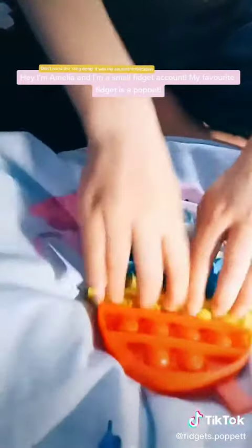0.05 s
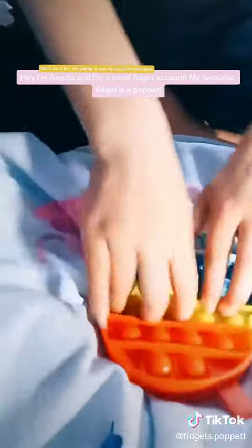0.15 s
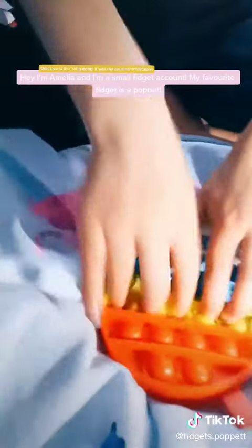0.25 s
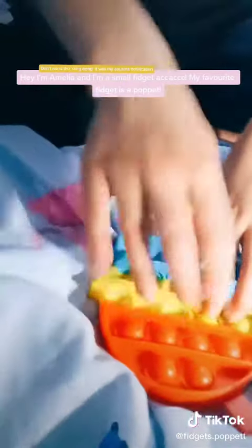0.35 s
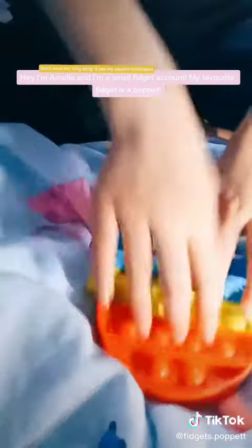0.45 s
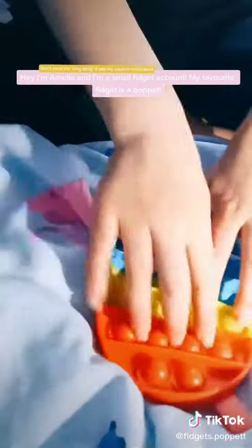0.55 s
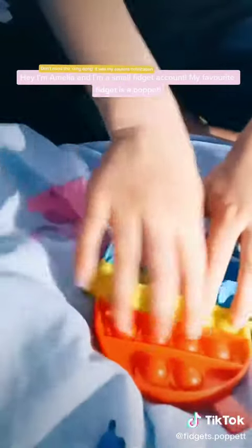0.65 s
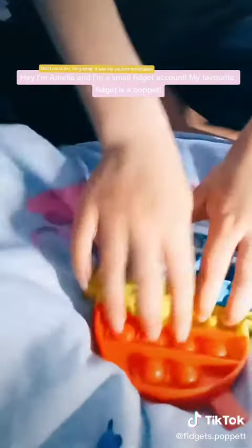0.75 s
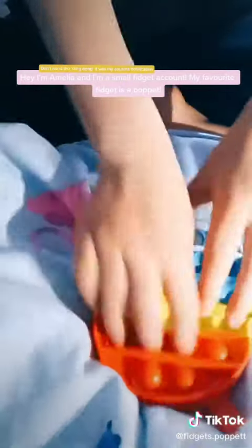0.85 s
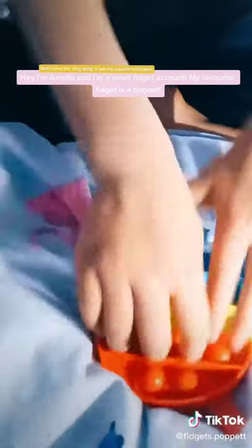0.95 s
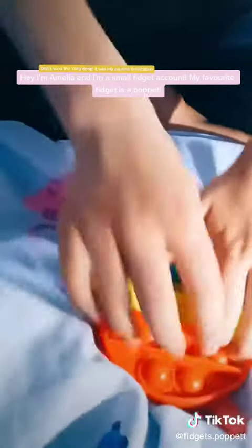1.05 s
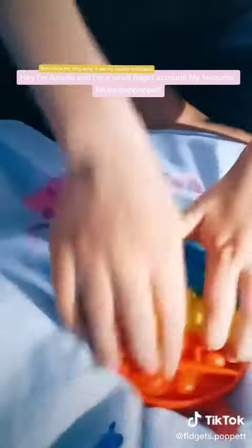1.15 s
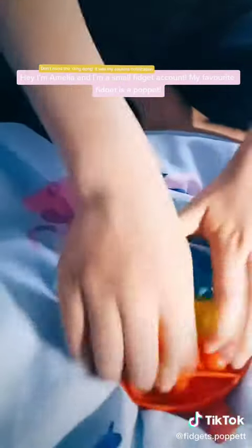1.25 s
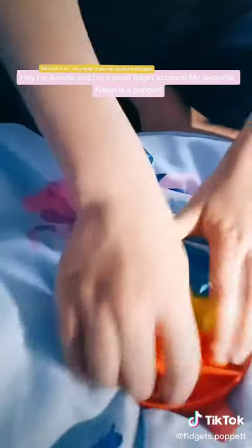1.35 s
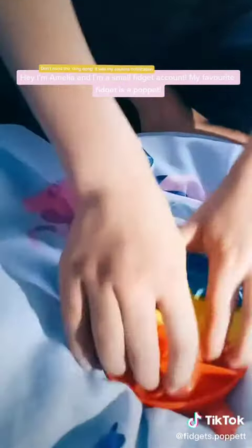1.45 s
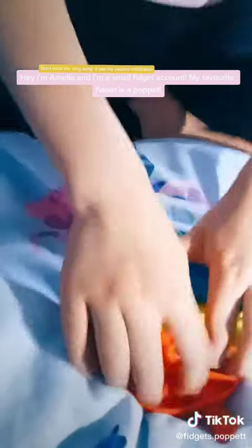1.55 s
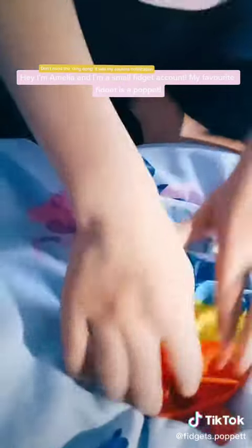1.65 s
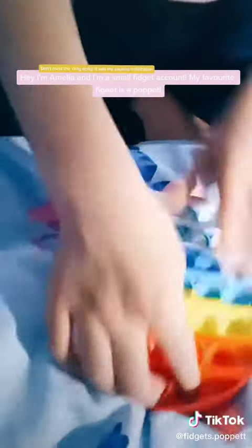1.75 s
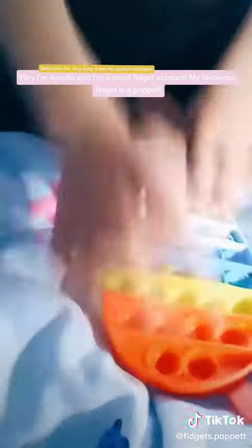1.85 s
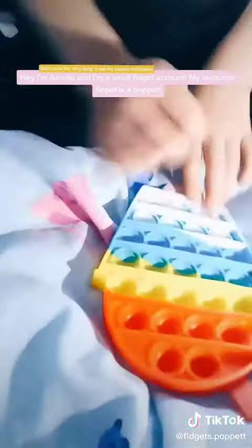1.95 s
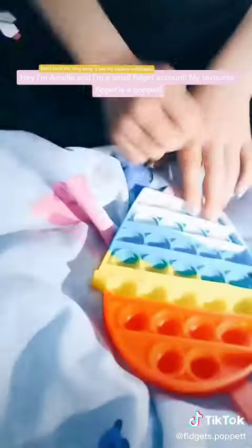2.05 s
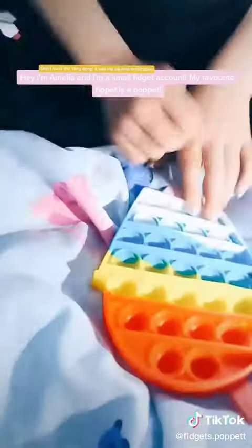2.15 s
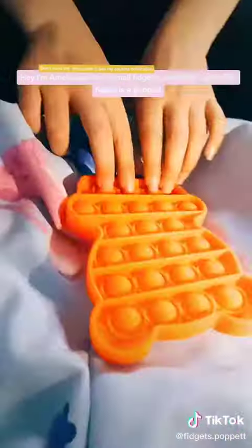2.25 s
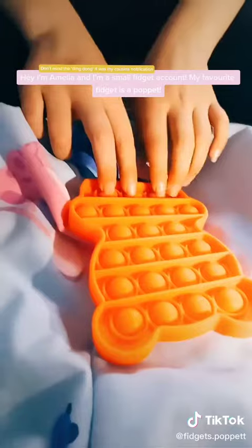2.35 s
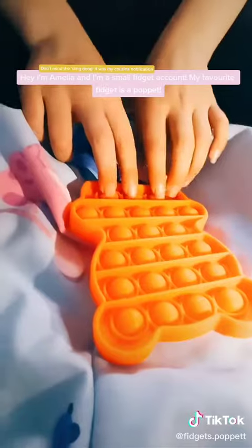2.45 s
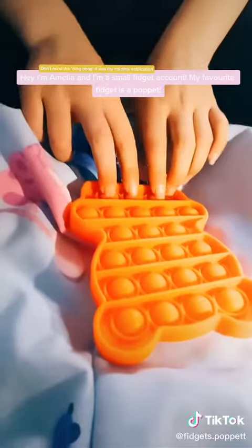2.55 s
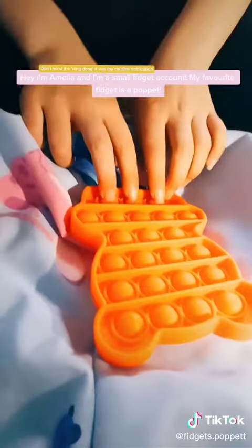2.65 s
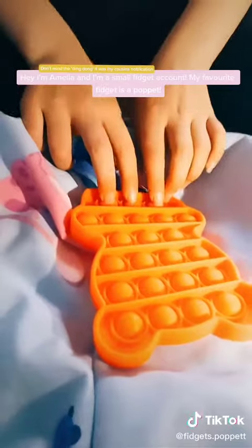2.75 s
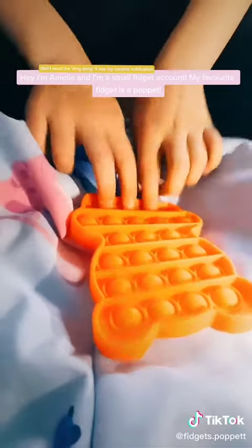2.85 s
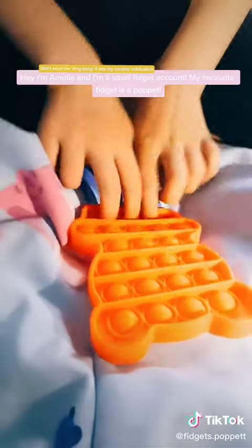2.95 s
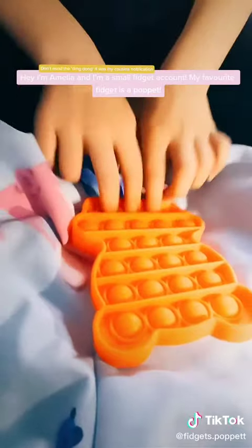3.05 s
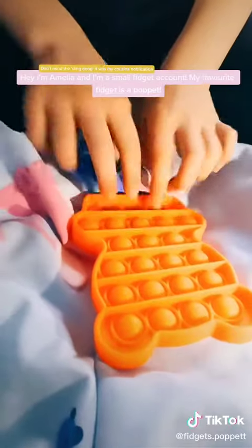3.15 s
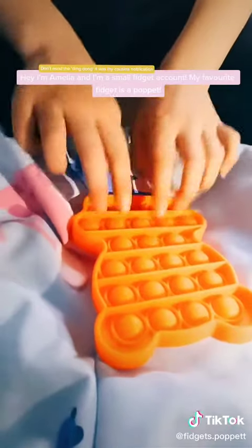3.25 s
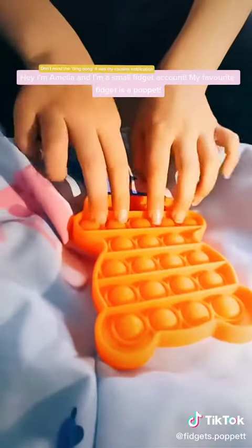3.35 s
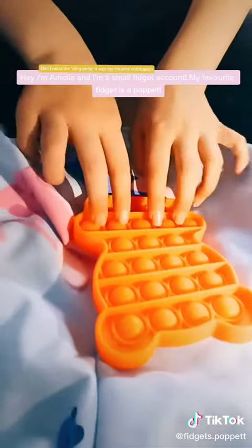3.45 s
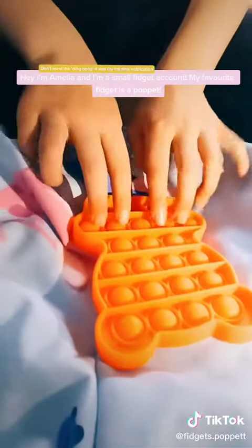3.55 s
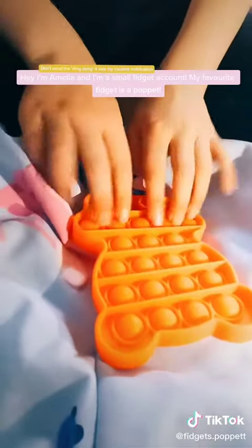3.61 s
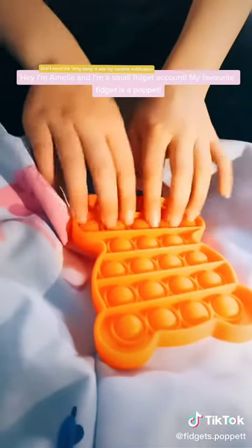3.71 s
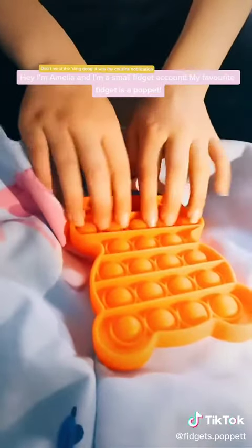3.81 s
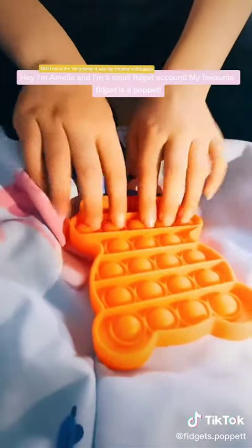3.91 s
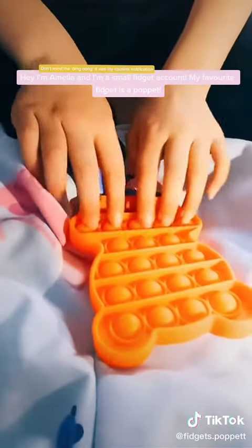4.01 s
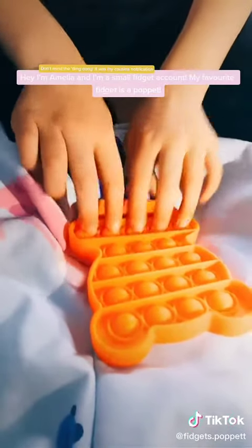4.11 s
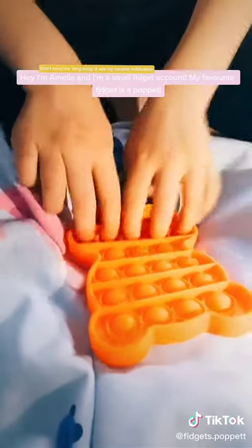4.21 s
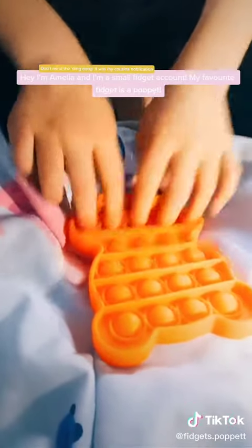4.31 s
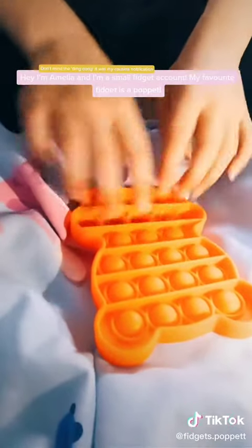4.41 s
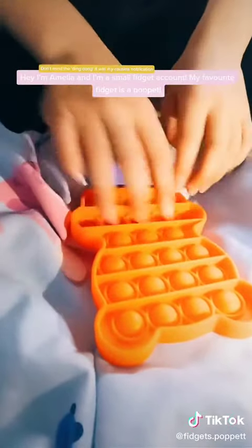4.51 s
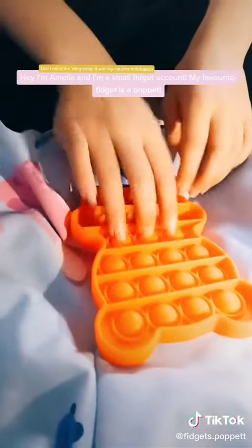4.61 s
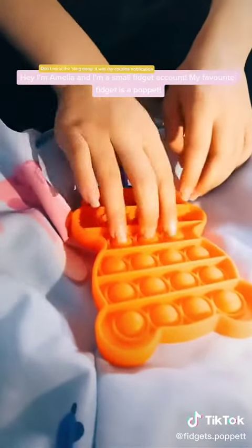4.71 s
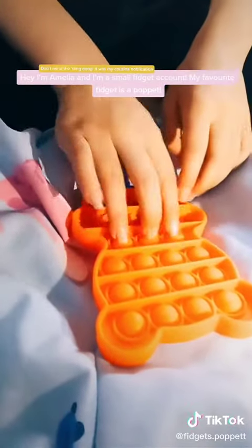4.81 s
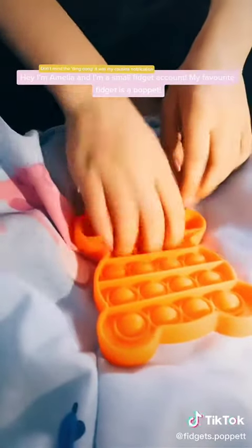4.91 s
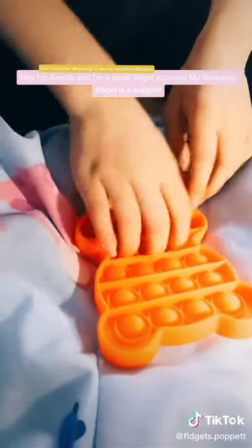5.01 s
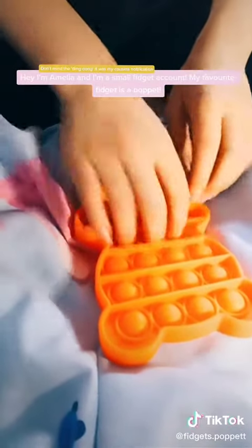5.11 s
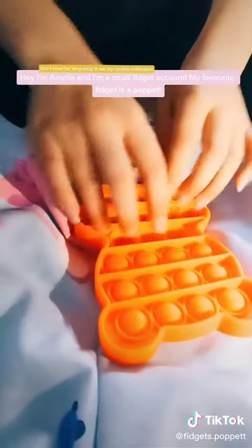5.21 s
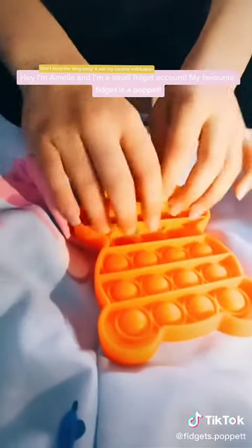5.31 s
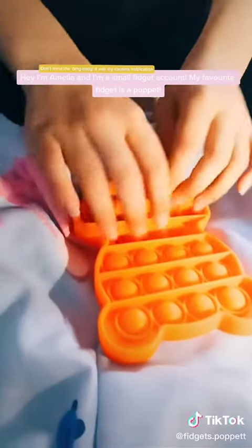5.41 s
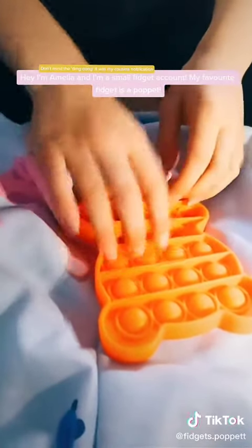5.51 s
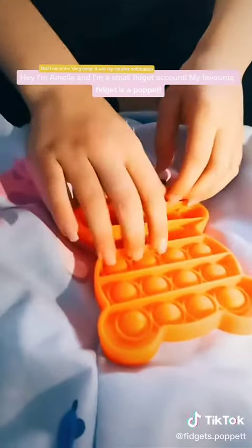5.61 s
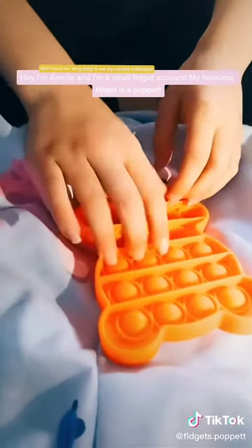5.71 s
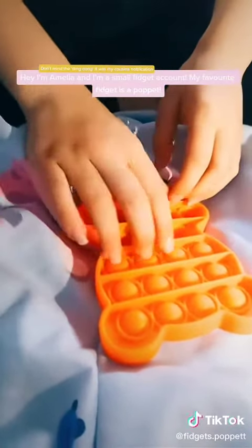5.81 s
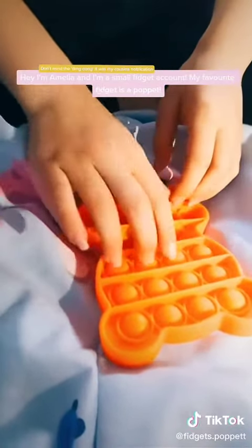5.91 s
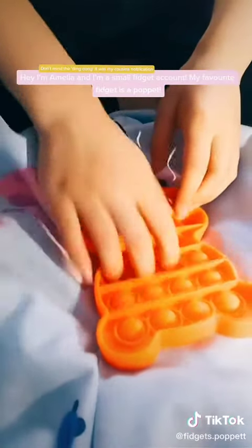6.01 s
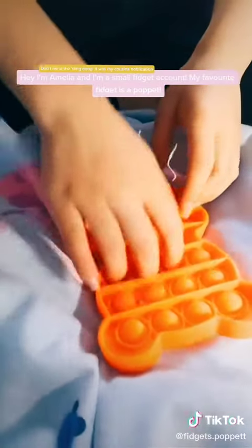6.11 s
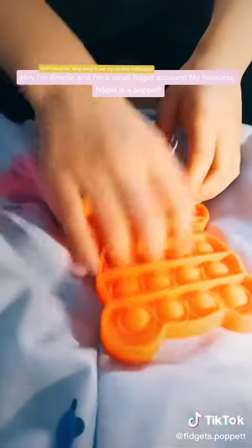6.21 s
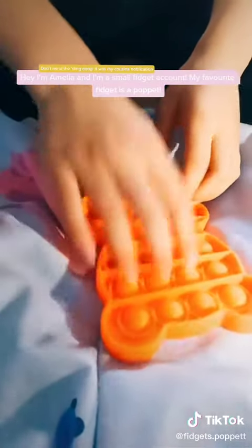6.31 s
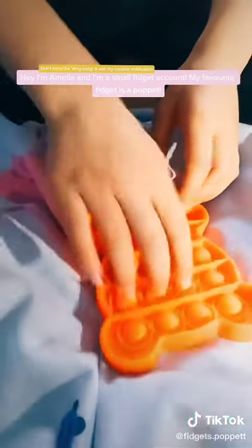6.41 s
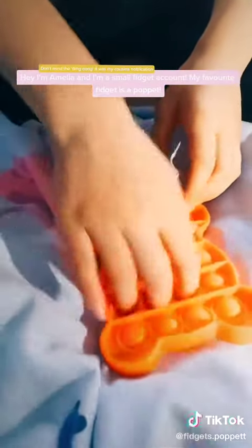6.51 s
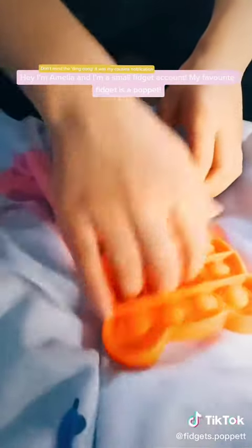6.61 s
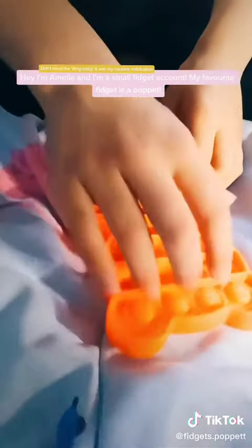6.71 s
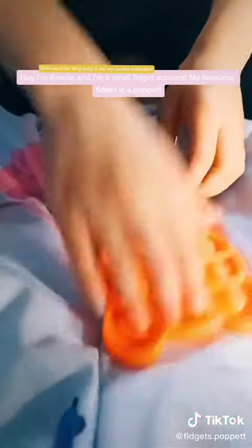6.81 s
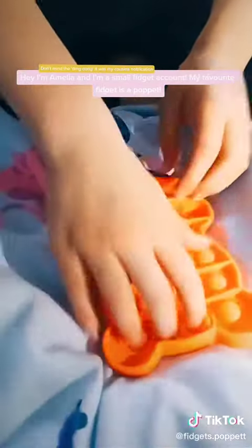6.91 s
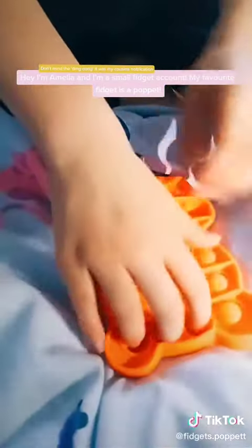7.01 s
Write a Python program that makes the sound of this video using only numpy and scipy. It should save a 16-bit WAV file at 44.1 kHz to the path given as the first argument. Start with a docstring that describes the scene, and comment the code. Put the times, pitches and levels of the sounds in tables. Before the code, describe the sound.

A close phone microphone picks up a silicone bubble toy on a duvet in a small bedroom, over faint, wide, low background noise. At 0.1 s three sharp hollow pops run together; soft taps and a thud follow near 0.5, then a tight cluster at 0.75-0.87. Single loud snaps come at 1.24, 1.49 and 1.63, with a firm knock into the bedding at 1.35. Skin and cloth rub at 1.9-2.15, then three dry bright ticks at 2.2 flick left and right as the background dips and gradually recovers. A quick group pops at 2.82-2.9. Faint rubs and hoarse squeaks lead to a dense crackling run at 4.13-4.19. More clusters follow at 4.92-4.96, 6.0, a softer one at 6.45, and a strong final trio at 6.9, with light taps, strokes and low thuds between. Each pop leaves a short boxy echo.

```python
"""Silicone bubbles snap on a pop-it toy that lies on a duvet, close to a phone in a small bedroom.
Each dome flips with a push and pull of air that rings its cup, plus filtered noise for crack and sheet.
Fingertips tap (ringing cups), rub (grainy noise), squeak (narrow noise) and thud the toy into the bedding
(fading sines); dry ticks sound left and right over a wide noise background that dips once.
The room answers with a short noise tail, and the phone's limiter holds down the loudest snaps."""
import sys
import numpy as np
from scipy import signal
from scipy.fft import rfft, irfft, next_fast_len
from scipy.io import wavfile
from scipy.ndimage import uniform_filter1d, minimum_filter1d

SR = 44100
rng = np.random.default_rng(int(sys.argv[2]) if len(sys.argv) > 2 else 0)


def wav_out(sig):
    """Save sig, one row per channel (or a flat mono array), as 16-bit PCM at SR to the path in sys.argv[1]."""
    wavfile.write(sys.argv[1], SR, np.round(np.clip(np.atleast_2d(sig).T, -1, 1) * 32767).astype(np.int16))


N = 311346
TIME = np.arange(N) / SR  # s
BLOW = np.arange(-256, 1024) / SR  # s, the time around one short contact


def undb(db):
    """Decibels to gain."""
    return 10 ** (np.asarray(db) / 20)


def unit(x):
    """Scale to rms 1."""
    return x / np.sqrt(np.mean(x ** 2))


def colour(x, points):
    """Minimum-phase filter drawn through (Hz, dB) points, so no sound leaks ahead of its cause."""
    size = next_fast_len(len(x) + 2048) * 2
    hz, db = np.transpose(points)
    bins = np.maximum(np.fft.rfftfreq(size, 1 / SR), 1)
    level_db = np.interp(np.log(bins), np.log(hz), db)
    # folding the cepstrum onto positive times makes the filter causal
    cepstrum = irfft(np.log(undb(level_db)))
    cepstrum[1:size // 2] *= 2
    cepstrum[size // 2 + 1:] = 0
    response = np.exp(rfft(cepstrum))
    return irfft(rfft(x, size) * response)[:len(x)]


def noise(points, count):
    """Coloured noise of rms 1."""
    return unit(colour(rng.standard_normal(count), points))


def resonate(x, hz, width_hz):
    """One resonance, gain 1 at its centre."""
    b, a = signal.iirpeak(hz, hz / width_hz, fs=SR)
    return signal.lfilter(b, a, x)


def swell(t, rise_s, fall_s):
    """Exponential rise up to t = 0, then exponential fall; both times are time constants."""
    return np.exp(-np.abs(t) / np.where(t < 0, rise_s, fall_s))


def add(track, s, sound):
    """Mix a sound into the track from time s."""
    start = int(round(s * SR))
    track[start:start + len(sound)] += sound[:N - start]


# Background spectrum: [f/Hz, relative level/dB per Hz]
AIR_COLOUR = [(15, -44.5), (25, -21), (47, -10), (87, -1.5), (212, -11.5), (330, -17.5), (440, -18.5),
              (510, -12.5), (620, -20.5), (775, -21.5), (1300, -23), (1480, -17.5), (1750, -24.5),
              (3000, -26.5), (3400, -26), (3820, -27), (5880, -28), (9070, -40.5), (12000, -42),
              (15000, -34)]
AIR_DB = -66.5
DIP_S, DIP_DB, DIP_FALL_S, DIP_RECOVER_S = 2.23, -17, 0.016, 0.31


def background(side_db):
    """Steady coloured noise, one layer in the middle and one at the sides, with one sudden dip and slow return."""
    level = undb(AIR_DB + DIP_DB * swell(TIME - DIP_S, DIP_FALL_S, DIP_RECOVER_S))
    mid = level * noise(AIR_COLOUR, N)
    side = undb(side_db) * level * noise(AIR_COLOUR, N)
    return mid, side


def snap(hz):
    """A dome darts through its flat state: one push of air and one pull, shorter when it is faster."""
    u = 2 * np.pi * hz * BLOW
    return -u / (1 + u ** 2) ** 2


# Spectrum of the noise that feeds each crack: [f/Hz, relative level/dB per Hz]
CRACK_COLOUR = [(600, -14), (2000, 1), (3500, -6), (5500, -7.5), (6600, -3), (7800, -19.5), (16000, -31.5)]


def crack(hz, rise_s, fall_s, width_hz=2300):
    """Tacky silicone tearing loose from the skin: a noise burst around one pitch."""
    tear = resonate(noise(CRACK_COLOUR, len(BLOW)), hz, width_hz)
    return unit(tear * swell(BLOW, rise_s, fall_s))


# Domes that flip: [t/s, level over 1 ms/dB, snap speed f/Hz, cup resonance f/Hz, crack centre f/Hz, crack level
# relative to the ringing body/dB, room send level relative to the near sound/dB]
POPS = [(0.09, -10, 750, 1220, 4200, -0.5, -16.5), (0.1003, -8.5, 510, 1340, 3650, -4, -4),
        (0.1103, -5, 1320, 1500, 3150, -2, -3), (0.749, -4.5, 992, 1180, 4120, -14, -12),
        (0.772, -9.5, 503, 1300, 5700, 2.5, -0.5), (0.8529, -7.5, 1220, 1424, 3880, 2, 0.5),
        (0.8572, -10, 1390, 1310, 3750, -15, -1.5), (0.871, -8.5, 1120, 1500, 4040, -8, -1),
        (1.241, -5, 990, 1218, 3900, -4.5, -4), (1.4894, -3.5, 1300, 1245, 3600, -4, -6),
        (1.6269, -5, 1000, 1020, 4270, -15, -10), (2.824, -21.5, 590, 880, 3236, -6, -2.5),
        (2.8654, -11, 1830, 980, 4550, -21, -4), (2.8856, -8, 1640, 980, 3470, -22, -4.5),
        (2.9017, -10.1, 1060, 1220, 3700, -17, 1.5), (4.1296, -16.5, 1000, 860, 2500, -19, 9.5),
        (4.1369, -15, 610, 1580, 3300, -21.5, 1), (4.1423, -8, 1100, 1500, 4900, -16.5, -3.5),
        (4.1431, -7.5, 2240, 1258, 4890, -21, -10), (4.148, -10, 897, 1545, 4070, -9.5, 2),
        (4.1536, -8, 990, 1340, 3430, -21, -9.5), (4.1916, -13, 553, 1340, 4530, -11, -0.5),
        (4.921, -12, 740, 900, 3650, -20.5, -0.5), (4.9293, -8, 1000, 1340, 3840, -13, -8),
        (4.933, -17.5, 670, 1527, 4670, -15, 0), (4.9416, -10.5, 736, 1220, 4460, -7.5, -2),
        (4.958, -6.5, 1220, 1150, 4400, -4, -3.5), (5.9895, -16, 610, 940, 3500, -25.5, 2),
        (6.0018, -4.5, 798, 800, 4680, 1.5, -17), (6.0169, -14, 670, 1590, 3570, -6.5, -2),
        (6.0186, -5.5, 970, 1200, 3730, -19.5, -1), (6.0203, -10.5, 814, 1386, 3740, -15.5, -2.5),
        (6.4398, -15, 544, 820, 2600, -29.5, -12), (6.462, -19, 1000, 1140, 3200, -13.5, -9.5),
        (6.4648, -6, 1190, 1096, 3180, -30, -3.5), (6.4663, -11, 990, 1410, 4200, -20, 3),
        (6.4835, -13, 840, 1440, 3900, -7.5, 1.5), (6.881, -7.5, 1090, 1140, 4300, -13, -6.5),
        (6.9059, -8, 1430, 756, 3720, -2.5, -0.5), (6.9236, -6.5, 960, 830, 4160, -16, -4.5)]
# Sheet of silicone around the domes: [f/Hz, relative level/dB per Hz]
SHEET_COLOUR = [(120, -16), (300, -2.5), (700, 0), (1200, 1.5), (2800, -8), (4000, -11.5), (6000, -11.5),
                (9000, -20.5)]
SOFT_SNAP_DB = -12  # snaps weaker than this get a lower treble corner


def pops(cup_gain=1.4, cup_width_hz=380, slip_db=-17, sheet_db=-10, damping_hz=6000, dullest_hz=3500,
         dull_hz_per_db=800, treble_burst_db=-42, treble_swell_db=-48, treble_per_db=1.75,
         treble_db_per_octave=8):
    """The finger slips, the dome flips and rings its cup. Returns the near sound and what reaches the room."""
    near, far = np.zeros(N), np.zeros(N)
    for s, db, snap_hz, cup_hz, crack_hz, crack_db, room_db in POPS:
        push = snap(snap_hz)
        body = unit(push + cup_gain * resonate(push, cup_hz, cup_width_hz))
        body += undb(crack_db) * crack(crack_hz, rise_s=0.00025, fall_s=0.00055)
        # a tackier finger also creaks more around the snap
        body += undb(slip_db + 0.9 * crack_db) * crack(crack_hz, rise_s=0.0019, fall_s=0.0025)
        # the sheet around the dome shudders and is still within milliseconds
        shudder = noise(SHEET_COLOUR, len(BLOW)) * swell(BLOW - .0008, 0.0021, 0.0025)
        body += undb(sheet_db) * unit(shudder)
        # soft rubber swallows the treble, more so in a weak snap
        softness_db = max(SOFT_SNAP_DB - db, 0)
        corner_hz = max(dullest_hz, damping_hz - dull_hz_per_db * softness_db)
        rubber = signal.butter(5, corner_hz, fs=SR, output="sos")
        body = unit(signal.sosfiltfilt(rubber, body))
        # faint treble noise: a short burst and a longer swell around the snap, stronger for loud, fast snaps
        treble_db = treble_per_db * (db + 9.5) + treble_db_per_octave * np.log2(snap_hz / 1200)
        hiss = rng.standard_normal(len(BLOW))
        body += undb(treble_burst_db + treble_db) * unit(hiss * swell(BLOW, .0002, .0004))
        body += undb(treble_swell_db + treble_db) * unit(hiss * swell(BLOW, 0.0018, 0.0025))
        # set the level as if the snap's energy filled one millisecond
        body *= undb(db) * np.sqrt(SR / 1000 / len(BLOW))
        add(near, s + BLOW[0], body)
        add(far, s + BLOW[0], undb(room_db) * body)
    return near, far


# Room echo spectrum, before its resonances: [f/Hz, relative level/dB per Hz]
ROOM_COLOUR = [(60, -8.5), (180, -3.5), (300, -8.5), (420, -5.5), (620, -9.5), (850, -6.5), (1200, -5.5),
               (1650, -6.5), (2050, -4), (2600, -8.5), (4200, -10), (5500, -11.5), (8000, -15.5),
               (16000, -26)]
# Boxy resonances of the room: [f/Hz, width/Hz, gain]
ROOM_MODES = [(433, 52, 0.38), (570, 55, .7), (1200, 110, .4)]
ROOM_T60_S, ROOM_T60_HIGH_S = 0.19, 0.25  # decay by 60 dB below and above about 2500 Hz


def bedroom(x, wet_db=-18.0, lumpy_db=3.0):
    """The bedding returns almost nothing; the ceiling answers first, then the walls; treble lingers longest."""
    t = np.arange(SR // 2) / SR
    lumps_db = lumpy_db * np.minimum(rng.exponential(size=len(t)), 4)
    echoes = rng.standard_normal(len(t)) * undb(lumps_db)
    low = signal.sosfiltfilt(signal.butter(2, 2500, fs=SR, output="sos"), echoes)
    high = echoes - low
    tail = low * undb(-60 * t / ROOM_T60_S) + high * undb(-60 * t / ROOM_T60_HIGH_S)
    # weak for the first 9 ms, then the ceiling's answer peaks at 10 ms
    arrival = np.where(t < .009, .25, 1) + .4 * swell(t - .01, .0003, .002)
    tail = colour(tail * arrival, ROOM_COLOUR)
    tail += sum(gain * resonate(tail, hz, width_hz) for hz, width_hz, gain in ROOM_MODES)
    return undb(wet_db) * signal.fftconvolve(x, tail / np.linalg.norm(tail))[:N]


# The toy pushed into the duvet: [t/s, level of the sine before its fade/dB, f/Hz]
THUDS = [(0.149, -36, 119), (.497, -35.5, 175), (0.507, -33, 102), (0.761, -40, 100), (0.866, -37.5, 120),
         (1.014, -32.5, 76.8), (1.034, -35.5, 80), (1.187, -34, 237), (1.203, -30.5, 141.3),
         (1.22, -37, 70.4), (1.332, -39.5, 174), (1.348, -25, 390), (1.351, -26, 163), (1.42, -40.5, 107),
         (1.598, -42.5, 100.8), (2.095, -44.5, 119.4), (2.825, -35, 230), (2.871, -32, 105),
         (2.896, -31, 165), (4.143, -32.5, 99), (4.20, -43.5, 110), (4.935, -42, 109.8),
         (5.546, -40.5, 101.7), (6.005, -43, 110.7), (6.357, -43, 110), (6.44, -50.5, 199),
         (6.806, -38, 66), (6.89, -33.5, 110)]


def thuds(rise_s=0.0026, cycles=0.79):
    """The toy bobs for a cycle or two on the soft bedding: a low sine that fades in proportion to its period."""
    out, t = np.zeros(N), np.arange(-512, 4096) / SR
    for s, db, hz in THUDS:
        bob = np.sin(2 * np.pi * hz * t) * swell(t, rise_s, cycles / hz)
        add(out, s + t[0], undb(db) * bob)
    return out


# Strokes of skin over silicone and cloth:
# [t of the fastest moment/s, fade time constant/s, hiss level before trim/dB, rumble level before trim/dB]
RUBS = [(0.32, 0.031, -64, -62.5), (0.677, .014, -60, -74.5), (1.028, .018, -69.5, -45.5),
        (1.082, 0.015, -59, -57), (1.872, 0.02, -59, -56), (1.92, 0.016, -50.5, -48),
        (2.1, .018, -59.5, -50.5), (2.16, 0.029, -76.5, -71), (3.22, .035, -78.5, -74.5),
        (3.74, .04, -77, -60), (3.9, .035, -77, -71), (4.358, .035, -60, -66.5),
        (6.192, 0.0079, -65.5, -65), (6.222, 0.012, -57, -68.5), (6.657, .018, -51.5, -55.5),
        (6.803, 0.012, -59.5, -53)]
# Hiss of the skin: [f/Hz, relative level/dB per Hz]
RUB_COLOUR = [(240, -36.5), (400, -8), (446, -24), (528, -7), (852, -3), (994, -9.5), (1870, -3),
              (2510, -10), (5520, -3.5), (8370, -29.5), (16000, -34)]
# Rumble of the bedding: [f/Hz, relative level/dB per Hz]
RUMBLE_COLOUR = [(20, -22.5), (55, -4.5), (110, 9.5), (220, -1), (450, -8), (900, -28), (4000, -66)]
RUB_RISE_SHARE = .85  # a stroke's rise time as a share of its fade time


def rubs(grain_db=4, catch_db=4, hiss_db=-1, rumble_db=-1.0, bump_db=3):
    """Sliding skin catches and lets go in tiny grains while the hand's weight shifts the bedding."""
    hiss, rumble = np.zeros(N), np.zeros(N)
    for s, fade_s, high_db, low_db in RUBS:
        # each stroke gathers speed, rounds off and slows again
        ramp = swell(TIME - s, RUB_RISE_SHARE * fade_s, fade_s)
        speed = 2 * ramp / (1 + ramp ** 2)
        hiss += speed * undb(high_db + hiss_db)
        rumble += speed * undb(low_db + rumble_db)
    # the grip changes every few milliseconds; a firmer catch scratches and tugs at once
    knots = TIME[::200]
    grip = np.interp(TIME, knots, rng.standard_normal(len(knots)))
    grit_db = grain_db * np.minimum(rng.exponential(size=N), 5)
    grains = rng.standard_normal(N) * undb(catch_db * grip + grit_db)
    tugs = rng.standard_normal(N) * undb(bump_db * grip)
    scratching = hiss * unit(colour(grains, RUB_COLOUR))
    tugging = rumble * unit(colour(tugs, RUMBLE_COLOUR))
    return scratching + tugging


# Tacky skin squeaking faintly on the rubber: [t of the middle/s, length/s, f/Hz, rms level before its fades/dB]
SQUEAKS = [(0.334, 0.073, 4170, -64), (3.069, 0.051, 3530, -65.5), (3.24, 0.052, 3250, -71.5),
           (3.754, 0.079, 1900, -71), (3.891, 0.045, 1812, -65), (4.355, 0.038, 1560, -63),
           (5.903, 0.043, 3298, -72.5), (6.198, 0.021, 5070, -51.5), (6.226, 0.028, 1640, -66)]


def squeaks():
    """Uneven stick and slip gives a brief, hoarse band of sound: noise through two equal resonances."""
    out = np.zeros(N)
    for s, length_s, hz, db in SQUEAKS:
        t = np.arange(int(4 * length_s * SR)) / SR - 2 * length_s
        chatter = rng.standard_normal(len(t))
        for _ in range(2):
            chatter = resonate(chatter, hz, hz / 5)
        bell = np.exp(-2 * (t / length_s) ** 2)
        add(out, s + t[0], undb(db) * unit(chatter) * bell)
    return out


# Fingertips landing on domes: [t/s, peak level/dB, cup resonance f/Hz, overtone f/Hz,
# overtone gain/dB, crack level relative to the ringing body/dB]
TAPS = [(0.465, -26, 723, 922, -10, -30.5), (.4715, -34, 1000, 1920, -12, -15.5),
        (0.496, -34.5, 830, 1700, -8, -18), (0.535, -26.5, 850, 1350, -1.5, -9),
        (.962, -35.5, 730, 1598, -2, -13), (1.027, -42, 868, 1800, -16, -26),
        (1.185, -25.5, 1180, 2345, -3, -24.5), (1.33, -40.5, 864, 1800, -8, -1),
        (1.3465, -21.5, 920, 1293, -4, -10), (1.351, -26, 585, 1300, -7, -6),
        (1.4125, -46, 1247, 2470, -3.5, -11), (2.8554, -26.5, 799, 1500, -6, -23.5),
        (2.864, -17.5, 1504, 3000, -5.5, -6), (3.287, -44.5, 1000, 1870, 8, -28),
        (4.605, -44, 1050, 1857, 3, -26.5), (5.534, -36, 961, 1827, 1, -19),
        (6.344, -30, 955, 2290, 1, -26), (6.361, -42, 900, 2200, 3, -10.5), (6.794, -32, 904, 1730, 16, -5)]


def taps(contact_hz=700, drag=1.0, cup_width_hz=190, overtone_width_hz=420, thump=0.049, skin_hz=4700):
    """A fingertip sinks onto a dome, dragging a little, and rings the cup without flipping it."""
    out = np.zeros(N)
    pad = signal.butter(3, 2400, fs=SR, output="sos")  # the soft fingertip
    for s, db, cup_hz, overtone_hz, overtone_db, crack_db in TAPS:
        skid = signal.sosfiltfilt(pad, rng.standard_normal(len(BLOW)) * swell(BLOW, 0.00035, 0.003))
        push = unit(snap(contact_hz)) + drag * unit(skid)
        ring = resonate(push, cup_hz, cup_width_hz)
        ring += undb(overtone_db) * resonate(push, overtone_hz, overtone_width_hz)
        body = unit(thump * push + ring)
        body += undb(crack_db) * crack(skin_hz, rise_s=0.00081, fall_s=0.0022)
        add(out, s + BLOW[0], undb(db) * body / np.abs(body).max())
    return out


# Dry, bright ticks: [t/s, peak level midway between left and right/dB, left minus right level/dB]
TICKS = [(2.1927, -20, 3), (2.197, -17, 9.5), (2.2021, -21.5, -9.5)]
# Tick spectrum: [f/Hz, relative level/dB per Hz]
TICK_COLOUR = [(200, -28), (500, 0), (950, 8.5), (1300, -7.5), (2200, 7), (5500, 1.5), (8000, -1),
               (11000, -25.5), (15000, -7)]


def ticks(scrape_db=-19):
    """Sharp noise ticks to the left and right, each within a short scrape."""
    out = np.zeros((2, N))
    for s, db, pan_db in TICKS:
        shape = swell(BLOW, 0.0004, 0.00034) + undb(scrape_db) * swell(BLOW, 0.0033, 0.0045)
        tick = noise(TICK_COLOUR, len(BLOW)) * shape
        tick /= np.abs(tick).max()
        for channel, ear_db in zip(out, (pan_db / 2, -pan_db / 2)):
            add(channel, s + BLOW[0], undb(db + ear_db) * tick)
    return out


def scene(side_db=-2.5, room_width_db=-20, handling_room_db=-1):
    """The toy is straight ahead; the background is wide and the room's echo has a trace of width."""
    air_mid, air_side = background(side_db)
    near, far = pops()
    handling = thuds() + squeaks() + taps()
    to_room = far + undb(handling_room_db) * handling
    mid = near + handling + bedroom(to_room) + rubs() + air_mid
    side = air_side + undb(room_width_db) * bedroom(to_room)
    return np.array([mid + side, mid - side]) + ticks()


TOP_HZ = 16000


def record(dry):
    """The phone's limiter ducks for a few milliseconds around each tall peak; deep bass and top are cut."""
    size, ceiling = 91, .85  # window in samples, peak amplitude
    allowed = np.minimum(1, ceiling / (np.abs(dry).max(axis=0) + 1e-9))
    gain = uniform_filter1d(minimum_filter1d(allowed, size), size)
    bass_cut = signal.butter(2, 42, "high", fs=SR, output="sos")
    top_cut = signal.ellip(8, .2, 70, TOP_HZ, fs=SR, output="sos")
    lean = signal.sosfilt(bass_cut, dry * gain)
    return signal.sosfilt(top_cut, lean)


dry = scene()
out = record(dry)
wav_out(out)
```